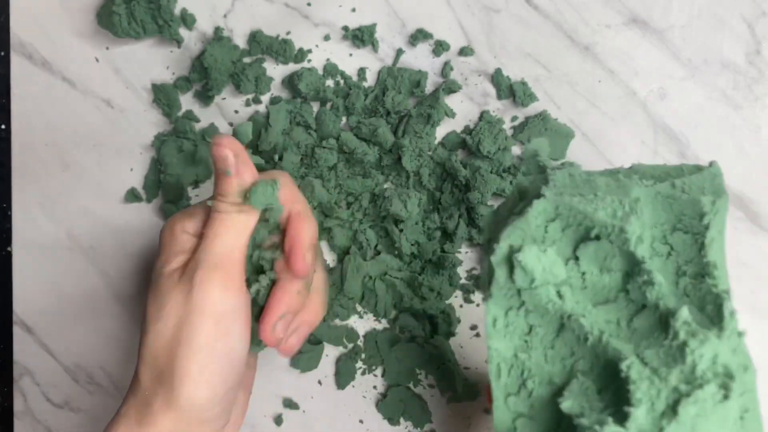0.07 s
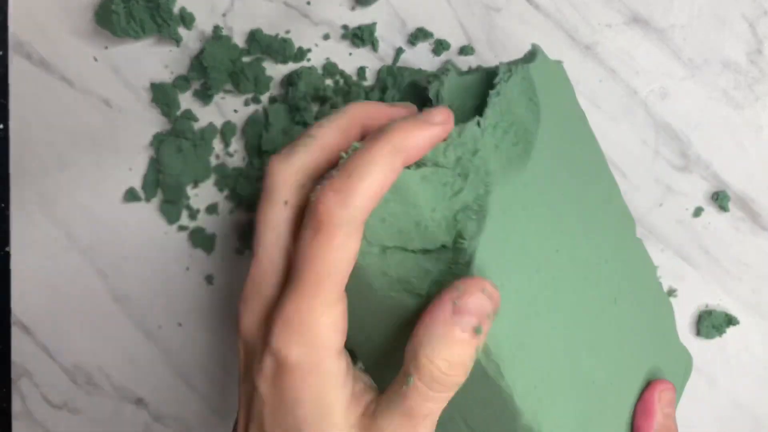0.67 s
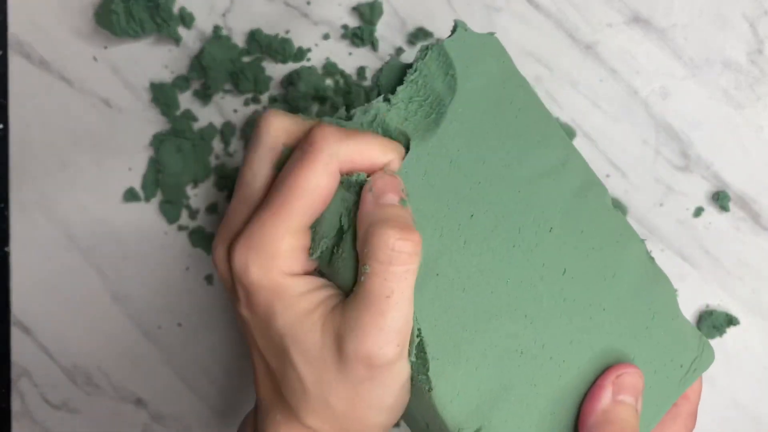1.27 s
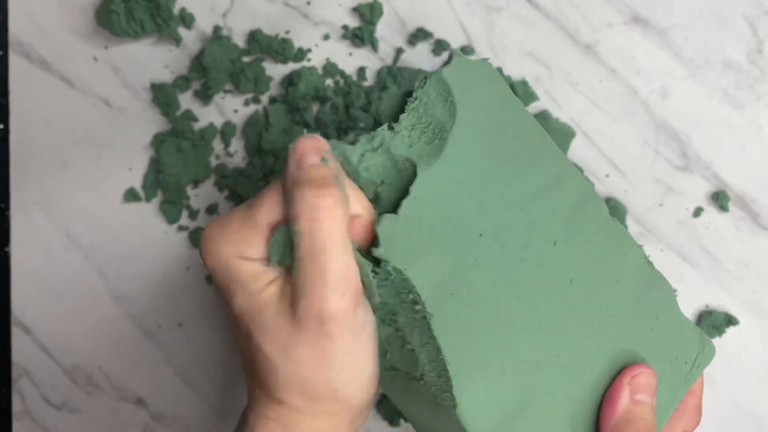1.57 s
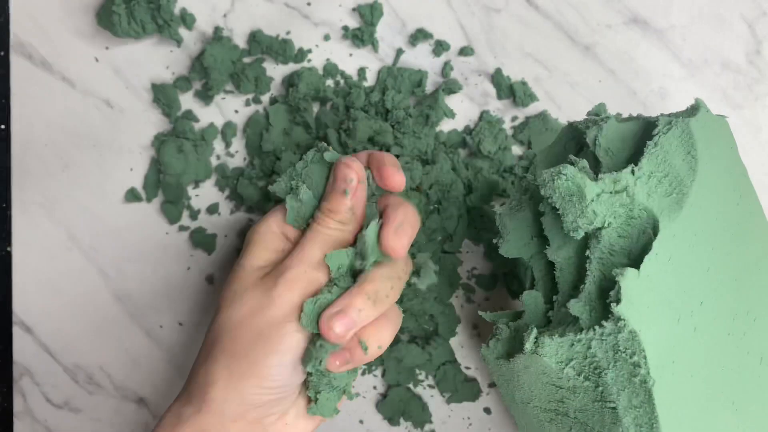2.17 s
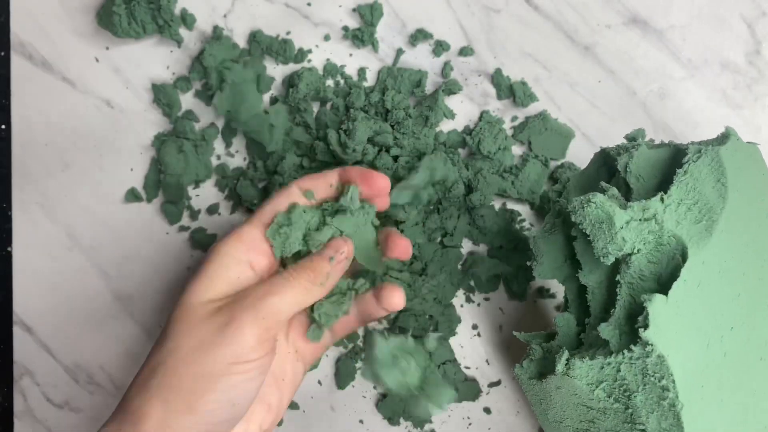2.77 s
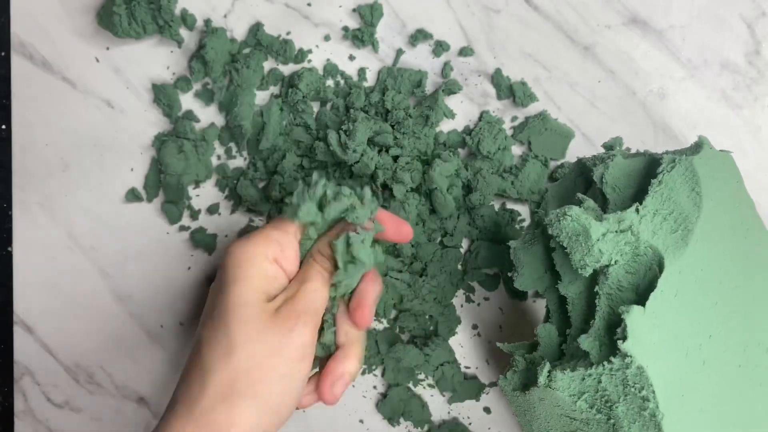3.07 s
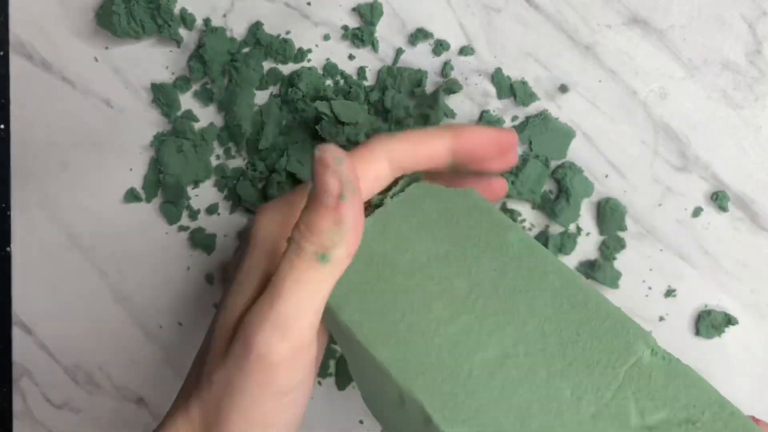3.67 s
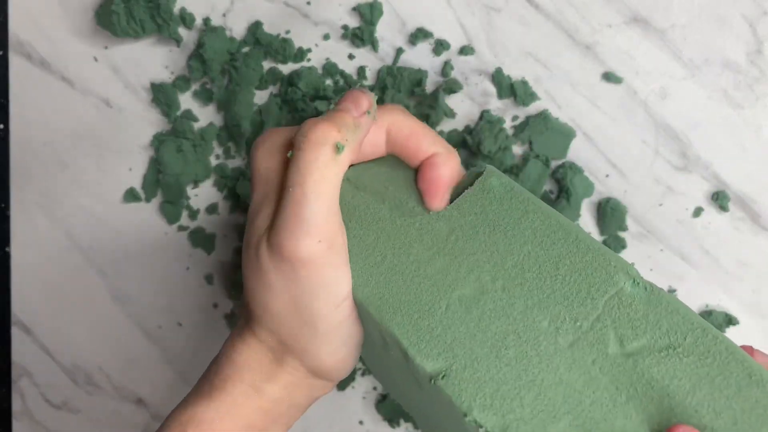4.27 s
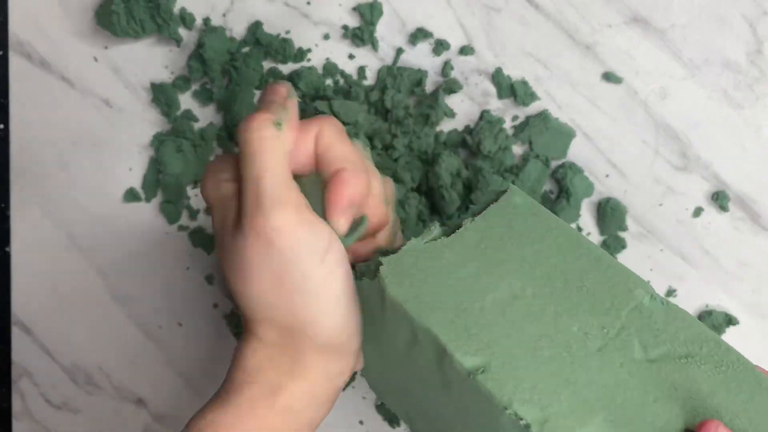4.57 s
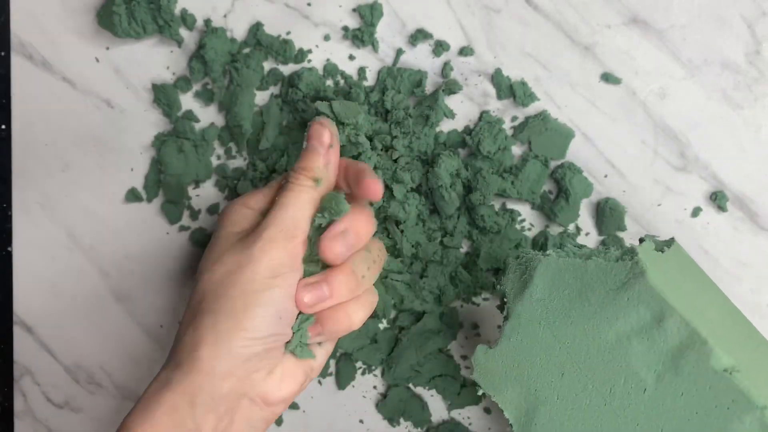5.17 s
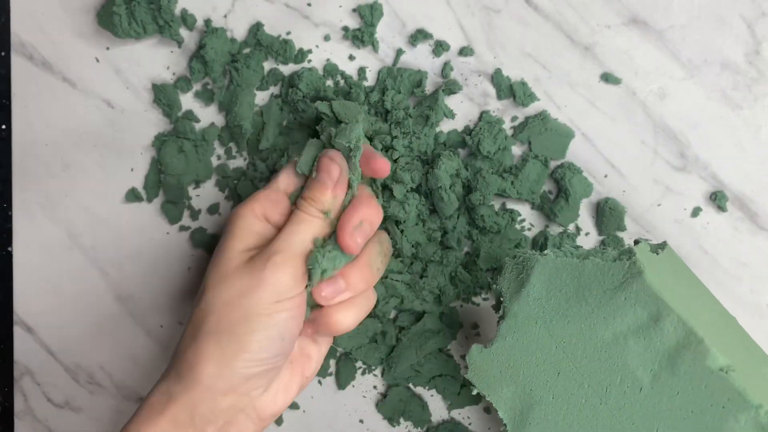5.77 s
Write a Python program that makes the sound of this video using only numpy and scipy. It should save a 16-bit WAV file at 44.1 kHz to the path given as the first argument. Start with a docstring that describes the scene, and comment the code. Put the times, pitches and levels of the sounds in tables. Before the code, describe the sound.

Very close to the microphone in a quiet room, a hand crushes dry foam twice. Each time, light rasping touches swell into a thick, grainy crunch with a slightly hollow body, broken by loud, sharp snaps as a piece tears away. Quieter pulses of crisp crackle and powdery hiss follow as the fingers grind the loose piece, with a couple of faint taps of crumbs landing on the table in the second round.

```python
"""Crushing dry floral foam

A hand feels a foam block, digs in, snaps a chunk off and crumbles it squeeze by squeeze, twice over.
Thousands of brittle cells collapse in clumps; the block lends them its hollow body while the chunk is
attached, and tightly packed foam hisses more. Crumbs drop on a stone table. The snaps overload two
close microphone ports; a quiet room rumbles behind."""
import sys
import numpy as np
from scipy import signal
from scipy.fft import rfft, irfft, next_fast_len
from scipy.io import wavfile
from scipy.ndimage import map_coordinates

SR = 44100
rng = np.random.default_rng(int(sys.argv[2]) if len(sys.argv) > 2 else 0)


def dump(signal):
    """Clip the signal to [-1, 1] and save it as 16-bit WAV at the path in sys.argv[1]."""
    limited = np.clip(np.atleast_2d(signal).T, -1, 1)
    pcm = np.round(limited * 32767).astype(np.int16)
    wavfile.write(sys.argv[1], SR, pcm)


N = 260631

# effort of the fingers sinking into the block: time_s, level_db
FIRST_EFFORT = [(0.77, -51), (0.85, -34.5), (0.94, -28), (0.99, -20.5), (1.06, -23.5), (1.1, -19.5),
                (1.15, -24.5), (1.28, -27), (1.33, -23.5), (1.45, -26), (1.555, -26.5), (1.66, -47)]
SECOND_EFFORT = [(3.76, -47), (3.815, -30.5), (3.96, -23.5), (4.01, -30), (4.1, -22.5), (4.18, -27.5),
                 (4.26, -23.5), (4.34, -30.5), (4.38, -24), (4.43, -29), (4.53, -29), (4.59, -48.5),
                 (4.66, -61.5)]
# tone of the crunch as heard, with a deep notch near 7.2 kHz: freq_hz, gain_db
FIRST_CRUNCH_EQ = [(100, -34), (600, -25), (1100, 2), (1650, 6.5), (2000, 4), (2400, 5), (3000, 1.5),
                   (3500, 0.5), (5200, -2.5), (6200, 0), (7200, -22.5), (15000, -22)]
SECOND_CRUNCH_EQ = [(100, -25), (750, -6), (1200, 0), (1700, 0), (2200, 4.5), (2700, -0.5), (3700, -4),
                    (5000, -6), (6300, -3), (7200, -35), (15000, -16)]
# the block's hollow resonances under each grip: pitch_hz, width_hz, gain_db
FIRST_BLOCK_MODES = [(268, 51, -4), (432, 78, 2.5), (652, 67, 4), (858, 64, 5.5), (1095, 92, -3.5),
                     (1470, 21, -1.5)]
SECOND_BLOCK_MODES = [(278, 180, -4.5), (474, 110, 6), (642, 23, 0), (1036, 45, 7), (1380, 61, -32)]
def grips():
    """The hand digs into the block twice, each time with its own crunch and body."""
    first = grip(FIRST_EFFORT, FIRST_CRUNCH_EQ, FIRST_BLOCK_MODES, free_s=1.3, hiss_db=-9.5,
                 packed_hiss_db=6.5, body_db=-2.5, touch_hiss_db=1.5, touch_body_db=-10)
    second = grip(SECOND_EFFORT, SECOND_CRUNCH_EQ, SECOND_BLOCK_MODES, free_s=3.4, hiss_db=-3,
                  packed_hiss_db=1.5, body_db=-5, touch_hiss_db=3, touch_body_db=-8)
    return first + second


# fingertips feel for a hold: start_s, length_s, level_db, hiss_over_crunch_db
TOUCHES = [(0.424, 0.028, -34, -6), (0.489, 0.17, -33.5, -9.5), (0.602, 0.065, -26.5, -9),
           (3.523, 0.078, -42, -7.5), (3.628, .11, -41, -6.5)]
# airy top of the powder: freq_hz, gain_db
HISS_EQ = [(300, -61), (2000, -24), (4000, -16.5), (6000, -7.5), (9000, 8), (12000, 5.5), (15500, 2)]
# close reflections off table, block and hand: delay_ms, gain_db
GRIP_REFLECTIONS = [(1.38, -20), (2.08, -18.5), (2.8, -20)]
FIRM_DB, LOOSEN_S = -18, 0.02  # level of a firm grip; time packed foam takes to loosen
def grip(curve, crunch_eq, modes, free_s, hiss_db, packed_hiss_db, body_db,
         touch_hiss_db, touch_body_db):
    """Fingers touch, then crush the block: one stream of cell ticks crunches, hisses and rings it."""
    start = curve[0][0]
    touch, touch_hiss = presses([row for row in TOUCHES if 0 < start - row[0] < 1])  # the second before
    force = effort(curve)
    packing = np.interp(np.arange(N) / SR, [start, free_s, free_s + LOOSEN_S], [0, 1, 0])
    crunch = amp(1.5) * np.hypot(amp(FIRM_DB) * force, touch)
    # with force, the hiss grows slower than the crunch and the body faster
    crush_hiss = amp(FIRM_DB + hiss_db + packed_hiss_db * packing) * force ** 0.84
    hiss = np.hypot(crush_hiss, amp(touch_hiss_db) * touch_hiss)
    body = np.hypot(amp(FIRM_DB + body_db) * force ** 1.205, amp(touch_body_db) * touch)
    ticks = cells(per_s=7000, spread_db=1, clump_db=1, clump_hz=300, scatter_db=-4.5, t60_s=0.035)
    bite = reflected(coloured(ticks, crunch_eq), GRIP_REFLECTIONS)
    return crunch * bite + hiss * coloured(ticks, HISS_EQ) + body * resonant(ticks, modes)


def effort(curve, fade_s=0.0096):
    """Gain of a grip relative to a firm one, faded to silence at both ends."""
    times, db = np.transpose(curve)
    t = np.arange(N) / SR
    gate = np.clip(np.minimum(t - times[0], times[-1] - t) / fade_s + .5, 0, 1)
    return amp(np.interp(t, times, db) - FIRM_DB) * gate


def cells(per_s, spread_db, clump_db, clump_hz, scatter_db, t60_s):
    """Bursting cells tick in small avalanches, each with a short scatter off hands and table."""
    bursting = rng.random(N) < per_s / SR
    sizes = amp(spread_db * np.minimum(rng.exponential(size=N), 4)) * np.sign(rng.standard_normal(N))
    clumps = amp(clump_db * (wobble(clump_hz) + 1.28 * wobble(45)))
    ticks = unit(bursting * sizes * clumps)
    decay = np.exp(-np.log(1e6) / (t60_s * SR))
    tail_power = signal.lfilter([1 - decay], [1, -decay], ticks ** 2)
    scatter = np.sqrt(np.abs(tail_power)) * rng.standard_normal((2, N))
    scatter = filtered(scatter, lambda hz: 1 / np.hypot(1, hz / 9000))  # skin and foam soak up treble
    return unit(ports(ticks) + amp(scatter_db) * scatter)


# the block fractures: start_s, tear_db, ring_db, start_pitch_hz, run_s, thump_db
FRACTURES = [(1.0759, 4, 1, 2130, 0.003, -40.5), (1.4841, 6.5, 4, 2262, 0.0044, -15),
             (4.2606, -2, 0, 2664, 0.004, -26.5), (4.3645, 7, 3.5, 3620, 0.0013, -58),
             (4.3707, 1, -3.5, 2880, 0.0029, -25)]
# tone of the rip: freq_hz, gain_db
TEAR_EQ = [(100, -3.5), (400, -15.5), (900, 3.5), (1700, -0.5), (2700, 1), (3800, -12.5), (5000, 0),
           (7000, -7.5), (15000, -16)]
# the block's low heave: pitch_hz, level_db, rise_s, t60_s
THUMP_MODES = [(61, -14.5, 0.01, 0.095), (112, -5, 0.0098, 0.038), (256, -5.5, 0.0024, 0.065),
               (370, -6, 0.0074, 0.11), (492, -2.5, 0.0042, 0.059)]
def snaps(sag=0.817, sag_s=0.0085):
    """A crack tears through; the freed faces ring, falling in pitch as it grows; the block thumps."""
    out, t = np.zeros((2, N)), np.arange(SR // 5) / SR
    for start, tear_db, ring_db, ring_hz, run_s, thump_db in FRACTURES:
        running = (1 - np.exp(-t / 0.0017)) * np.exp(-(t / run_s) ** 2)
        pitch = ring_hz * (1 - sag * (1 - np.exp(-t / sag_s)))
        ring = amp(ring_db + 2.5) * np.sin(2 * np.pi * np.cumsum(pitch) / SR) * running
        rip = rng.standard_normal(len(t))
        edge = resonant(rip, [(2500, 260, 0.019), (5530, 630, 0.0065)])
        splinters = unit(coloured(rip, TEAR_EQ) + amp(-12.5) * edge)
        lingering = 0.31 * swell(t, 0.004, 0.02)  # splinters keep breaking after the crack stops
        tear = amp(tear_db - 7) * splinters * (running + lingering)
        thump = sum(amp(db) * np.sin(2 * np.pi * (hz * t + rng.random())) * swell(t, rise, t60)
                    for hz, db, rise, t60 in THUMP_MODES)
        snap = ring + tear + amp(thump_db) * thump
        room = rng.standard_normal((2, len(t))) * swell(t, 0.0012, 0.07)
        reverb = signal.fftconvolve(snap[None], room / np.linalg.norm(room[0]), axes=1)[:, :len(t)]
        add(out, start, ports(snap) + amp(-6) * reverb)
    return out


# the fist closes on loose pieces: start_s, length_s, level_db, hiss_over_crunch_db, cup_hz
SQUEEZES = [(-0.058, 0.044, -40, -1.5, 2100), (0.007, 0.055, -46.5, -4, 3620),
            (1.623, 0.19, -38.5, -7.5, 2450), (1.854, 0.12, -44.5, -3, 3500),
            (1.972, 0.15, -40.5, -6.0, 3300), (2.076, 0.15, -43, 2.5, 3570), (2.193, 0.11, -35, -2.5, 3900),
            (2.28, 0.17, -42.5, -4, 3080), (2.418, 0.12, -42, -10, 1500), (2.606, 0.21, -48, -7.5, 2070),
            (2.744, 0.16, -40.5, -7.5, 3380), (2.852, 0.14, -45.5, -1.5, 3680),
            (2.955, 0.12, -39.5, -5, 1880), (3.05, 0.14, -51, -2.5, 2000), (3.23, 0.1, -47, -4, 2860),
            (3.335, 0.055, -52, -6, 2890), (3.458, 0.056, -58, -2.5, 2450),
            (4.614, 0.18, -43.5, -6.5, 2350), (4.851, 0.038, -47.5, -5, 1860),
            (4.946, 0.115, -39.5, -7.5, 3300), (5.034, 0.13, -42, 0, 3450), (5.128, 0.16, -48.5, 0.5, 4200),
            (5.263, 0.094, -42.5, -9.5, 1460), (5.361, 0.15, -43, -10, 2200),
            (5.526, 0.065, -36, -4.5, 4700), (5.602, 0.11, -36, -6, 2120), (5.712, 0.16, -39, -4.5, 3830)]
# tone of the crumbling as heard, with a deep notch near 7.2 kHz: freq_hz, gain_db
CRUMBLE_EQ = [(100, -6.5), (650, -8.5), (950, 0), (1250, -1.5), (1550, 3), (2400, 3.5), (3500, 4),
              (5000, 0.5), (6100, 1.5), (7200, -13.5), (15000, -24)]
# close reflections around the fist: delay_ms, gain_db
FIST_REFLECTIONS = [(1.1, -23), (2.08, -15.5), (2.8, -15)]
def fist(cup_db=-11, cup_width_hz=520):
    """Pieces grind to fine ticks and coarse grit; the grit rings the hand, cupped anew each squeeze."""
    crunch, hiss = presses(SQUEEZES)
    ticks = cells(per_s=6000, spread_db=-1.5, clump_db=0.5, clump_hz=140, scatter_db=-14, t60_s=0.05)
    grit = cells(per_s=260, spread_db=0, clump_db=2.5, clump_hz=24, scatter_db=5.5, t60_s=0.018)
    coarse = reflected(ticks + amp(-8) * grit, FIST_REFLECTIONS)
    out = amp(1) * crunch * coloured(coarse, CRUMBLE_EQ) + amp(4) * hiss * coloured(ticks, HISS_EQ)
    t = np.arange(N) / SR
    for start, length, db, _, cup_hz in SQUEEZES:
        near = np.flatnonzero((t > start) & (t < start + length + .2))
        cup = resonant(grit[:, near], [(cup_hz, cup_width_hz, 0)])
        out[:, near] += amp(db + cup_db) * press(t[near] - start, length) * cup
    return out


def presses(rows):
    """Crunch and hiss envelopes of a run of finger presses, adding in power."""
    t, crunch, hiss = np.arange(N) / SR, np.zeros(N), np.zeros(N)
    for start, length, db, hiss_db, *_ in rows:
        near = (t > start) & (t < start + length + .5)
        gain = amp(db) * press(t[near] - start, length)
        crunch[near] += gain ** 2
        hiss[near] += (gain * amp(hiss_db)) ** 2
    return np.sqrt(crunch), np.sqrt(hiss)


def press(age, length, attack_s=0.075, release_db_per_s=197.5):
    """Envelope of one finger press: attack, hold, release."""
    attack = np.sin(np.pi / 2 * np.minimum(age / attack_s, 1)) ** 2
    return attack * amp(-release_db_per_s * np.maximum(age - length, 0))


# sharp ticks in the crunch: start_s, level_db, centre_hz, t60_s
WALL_CRACKS = [(1.195, -8.5, 1630, 0.017), (1.316, -13, 1500, .02), (1.914, -33.5, 3670, .03),
               (2.079, -29.5, 3400, .02), (2.143, -20.5, 3960, 0.015), (2.246, -15.5, 3160, 0.037),
               (2.652, -36.5, 2030, .02), (2.849, -28, 3460, .02), (3.002, -23.5, 4640, .02),
               (3.05, -24.5, 1830, .019), (3.161, -35.5, 1960, .02), (3.842, -12, 2100, .015),
               (3.877, -9.5, 2080, .015), (3.913, -15.5, 2050, .015), (4.152, -12.5, 4030, 0.0099),
               (5.007, -33, 3470, .01), (5.096, -19.5, 4000, .01), (5.113, -17.5, 3470, 0.014),
               (5.391, -30, 1860, .02), (5.554, -21.5, 2140, .008), (5.701, -20.5, 3900, .012)]
def cracks():
    """Small walls of foam give way with a hard attack and a strong ring."""
    return bursts(WALL_CRACKS, rise_s=0.00057, gain_db=-7, ring_db=12, fizz_db=-11.5)


# longer rasps: start_s, level_db, centre_hz, t60_s
CLUMP_SHEARS = [(0.442, -22, 2200, 0.074), (0.668, -13.5, 2250, 0.1), (0.984, -17, 2380, 0.086),
                (1.318, -9, 3050, 0.05), (1.422, -6.5, 1960, 0.058), (2.68, -29.5, 3510, .06),
                (3.569, -21, 2330, 0.086), (3.693, -25.5, 1730, .07), (3.953, -9.5, 1690, 0.037),
                (4.75, -25, 1480, 0.12), (4.882, -34.5, 1910, .06), (5.433, -22.5, 2070, 0.059),
                (5.579, -13.5, 2140, 0.066)]
def shears():
    """Whole clumps shear off with a softer attack and a broader tone."""
    return bursts(CLUMP_SHEARS, rise_s=0.0088, gain_db=-11.5, ring_db=0, fizz_db=-14.5)


def bursts(rows, rise_s, gain_db, ring_db, fizz_db):
    """Sudden runs of breaking cells: a broad crunch, tinted by the piece that gives way."""
    out, t = np.zeros((2, N)), np.arange(SR // 6) / SR
    for start, db, hz, t60 in rows:
        noise = ports(rng.standard_normal(len(t))) + .5 * rng.standard_normal((2, len(t)))
        crunch = unit(coloured(noise, CRUMBLE_EQ) + amp(ring_db) * resonant(noise, [(hz, hz / 2, 0)]))
        fizz = amp(fizz_db) * coloured(noise, HISS_EQ)
        add(out, start, amp(db + gain_db) * (crunch + fizz) * swell(t, rise_s, t60))
    return out


# a fingertip skids on the foam: start_s, rise_s, t60_s, pitch_hz
SKID = (0.63, 0.025, 0.083, 1245)
# its harmonics, from the fundamental up: level_db
SKID_HARMONICS = [-45, -27.5, -26.5]
def squeak(jitter=0.018):
    """Unsteady stick and slip gives the first scrape a short, hoarse pitch."""
    start, rise, t60, hz = SKID
    out, t = np.zeros(N), np.arange(SR // 5) / SR
    phase = 2 * np.pi * np.cumsum(hz * (1 + jitter * wobble(620)[:len(t)])) / SR
    tone = sum(amp(db) * np.sin(k * phase) for k, db in enumerate(SKID_HARMONICS, 1))
    add(out, start, swell(t, rise, t60) * tone)
    return ports(out)


# crumbs hit the table: start_s, level_db, pitch_hz
CRUMB_TAPS = [(4.748, -28, 620), (5.889, -35, 420)]
def crumbs():
    """Light crumbs land with a dry tap of a cycle or two."""
    out, t = np.zeros(N), np.arange(SR // 8) / SR
    for start, db, hz in CRUMB_TAPS:
        add(out, start, amp(db) * np.sin(2 * np.pi * hz * t) * swell(t, 0.0012, 0.0063))
    return ports(out)


# dull rub of the hands, and the room's rumble: freq_hz, gain_db
RUB_EQ = [(30, -33), (70, -15), (110, -1.5), (190, -4), (290, -3), (370, -30), (900, -18), (2500, -75)]
ROOM_EQ = [(22, -31.5), (35, -1.5), (48, 1.5), (85, 4), (150, -3), (280, -26), (360, -19), (580, -26.5),
           (850, -41), (1150, -29.5), (2000, -38.5), (3400, -34), (8000, -48.5), (15000, -40)]
def background(rest_db=-53, grip_db=-44, squeeze_db=-12):
    """Room rumble, faint mains hum and the rub of the hands, which grows with each grip and squeeze."""
    gripping = amp(grip_db) * np.sqrt(effort(FIRST_EFFORT) + effort(SECOND_EFFORT))
    squeezing = amp(squeeze_db) * presses(SQUEEZES)[0]
    rub_gain = np.hypot(amp(rest_db), gripping + squeezing)
    hum = amp(-48 + 2.5 * wobble(6.7)) * np.sin(2 * np.pi * 50 * np.arange(N) / SR)
    rumble = amp(-48.5) * coloured(stereo_noise(width=0.14), ROOM_EQ)
    rub = amp(2.2 * wobble(6.4)) * rub_gain * coloured(stereo_noise(width=0.43), RUB_EQ)
    return rumble + rub + hum


def reflected(x, reflections, sway_ms=0.041, skew_ms=0.013):
    """Close reflections comb the sound, shifting with the hand and differing between the ports."""
    n, out = np.arange(N), x.copy()
    for ms, db in reflections:
        path_ms = ms + sway_ms * wobble(3)
        for port, side in enumerate((-.5, .5)):
            delay = (path_ms + side * skew_ms) * SR / 1000
            out[port] += amp(db) * np.interp(n - delay, n, x[port])
    return unit(out)


# phase of the left port ahead of the right: freq_hz, lead_rad
PORT_PHASE = [(200, 0), (690, -.5), (1400, 0), (3100, .8), (5100, .4), (6300, 2.1), (7250, 3.1),
              (10500, 6.3), (13600, 9.4), (16000, 12.5)]
def ports(x):
    """Mono to stereo: a close source's treble reaches the left port just before the right."""
    return filtered(x, lambda hz: np.exp(1j * along(PORT_PHASE, hz) * np.array([[.5], [-.5]])))


def amp(db):
    """Decibels to gain."""
    return 10 ** (np.asarray(db) / 20)


def unit(x):
    """Scale to rms 1."""
    return x / np.sqrt(np.mean(x ** 2) + 1e-20)


def along(points, hz):
    """Read a curve of (freq_hz, value) points on a log frequency axis."""
    freqs, values = np.transpose(points)
    return np.interp(np.log(hz + 1), np.log(freqs + 1), values)


def wobble(rate):
    """A smooth random curve with rate knots a second."""
    return map_coordinates(rng.standard_normal(int(N * rate / SR) + 4), [np.arange(N) * rate / SR])


def stereo_noise(width):
    """Centred white noise plus separate noise on each side."""
    return rng.standard_normal(N) + width * rng.standard_normal((2, N))


def swell(t, rise_s, t60_s):
    """Envelope of peak 1 that rises and dies away."""
    shape = (1 - np.exp(-(t / rise_s) ** 2)) * amp(-60 * t / t60_s)
    return shape / shape.max()


def filtered(x, response):
    """x through a complex frequency response."""
    n = x.shape[-1]
    size = next_fast_len(n + 4096)
    return irfft(rfft(x, size) * response(np.fft.rfftfreq(size, 1 / SR)), size)[..., :n]


def coloured(x, eq):
    """x through an EQ curve, at rms 1."""
    return unit(filtered(x, lambda hz: amp(along(eq, hz))))


def resonant(x, modes):
    """x through (pitch_hz, width_hz, gain_db) resonances of alternating polarity, at rms 1."""
    def response(hz):
        return sum((-1) ** k * amp(db) * 1j * hz * width / (pitch ** 2 - hz ** 2 + 1j * hz * width)
                   for k, (pitch, width, db) in enumerate(modes))
    return unit(filtered(x, response))


def add(track, start_s, x):
    """Mix x into track at start_s."""
    part = track[..., round(start_s * SR):][..., :x.shape[-1]]
    part += x[..., :part.shape[-1]]


def scene():
    """Two grips on the block, their snaps and the crumbling, over a quiet room."""
    return grips() + cracks() + shears() + fist() + squeak() + snaps() + crumbs() + background()


# stereo tilt of the ports: freq_hz, left_minus_right_db
PORT_TILT = [(60, -2.5), (110, 2.5), (200, 0), (380, -4.5), (700, 2), (1290, -1), (2380, -1.5), (4400, -3),
             (8120, 0.5), (15000, 0)]
def record(dry, top_hz=15850):
    """The ports differ a little in tone; the snaps clip at full scale; the very top is cut off."""
    heard = filtered(dry, lambda hz: amp(along(PORT_TILT, hz) * np.array([[.5], [-.5]])))
    return filtered(np.clip(heard, -1, 1), lambda hz: hz < top_hz)


dry = scene()
out = record(dry)
dump(out)
```